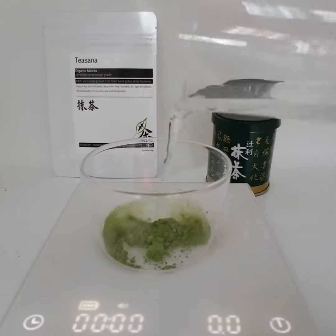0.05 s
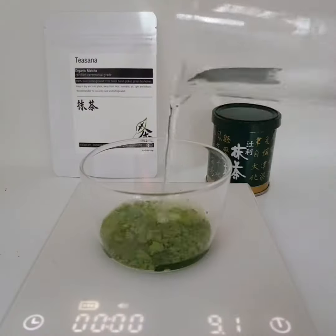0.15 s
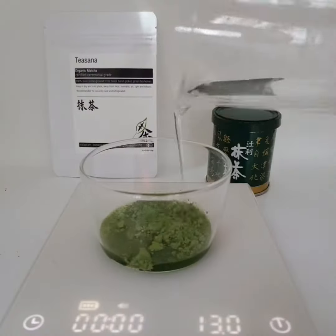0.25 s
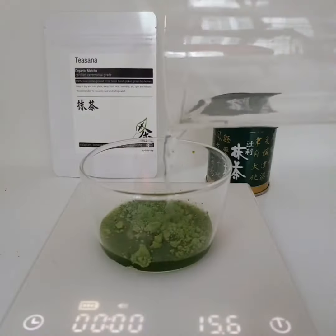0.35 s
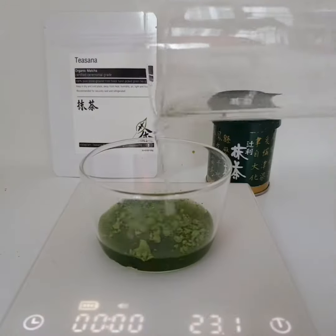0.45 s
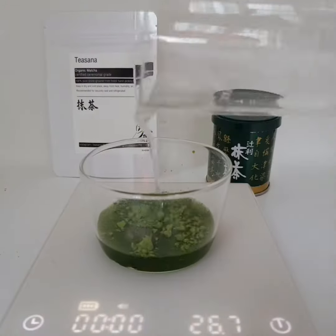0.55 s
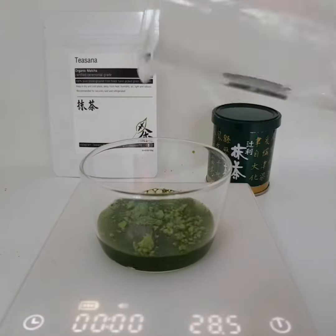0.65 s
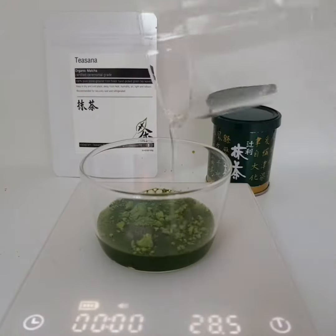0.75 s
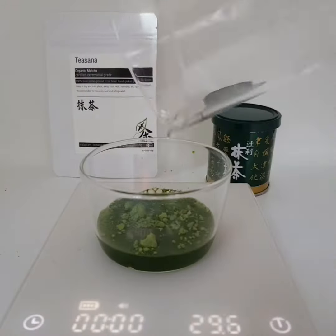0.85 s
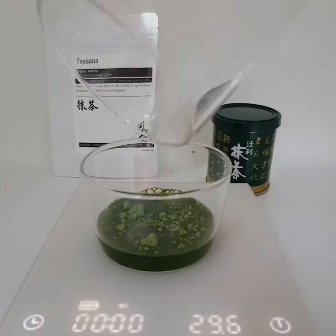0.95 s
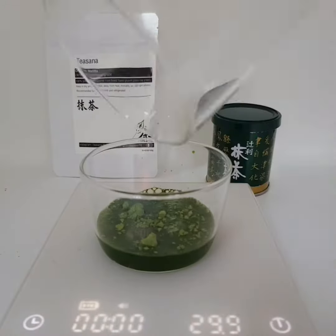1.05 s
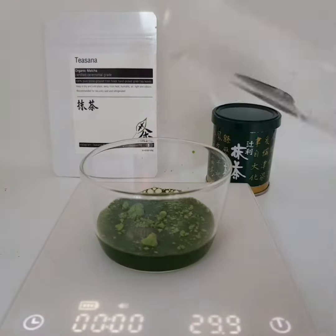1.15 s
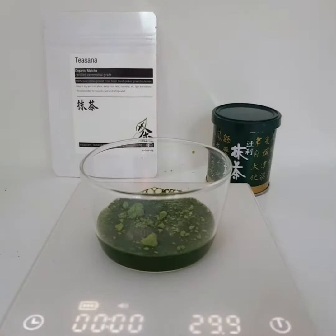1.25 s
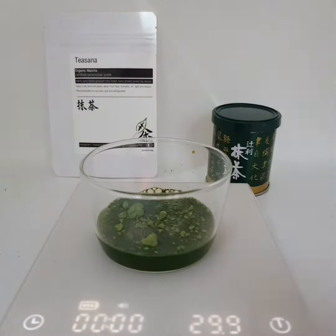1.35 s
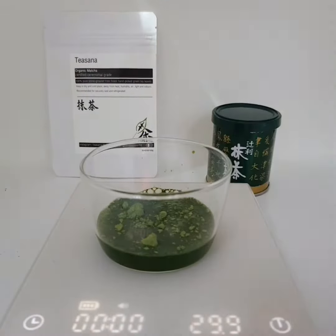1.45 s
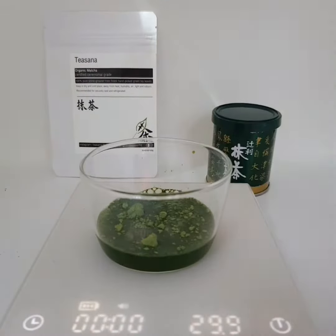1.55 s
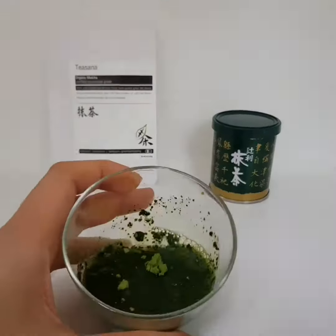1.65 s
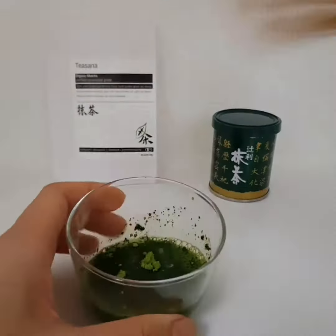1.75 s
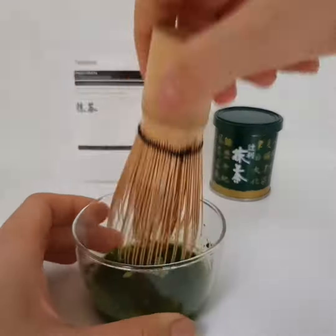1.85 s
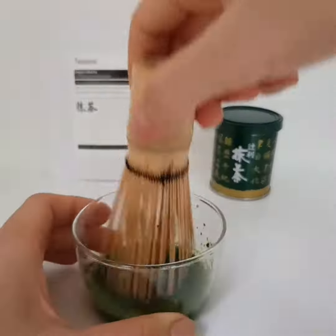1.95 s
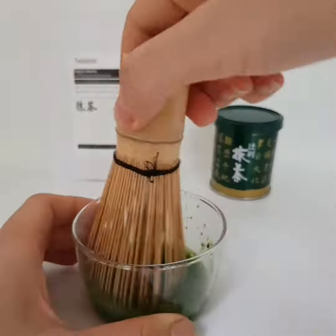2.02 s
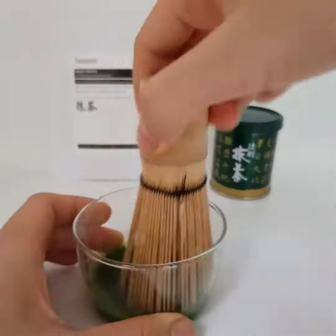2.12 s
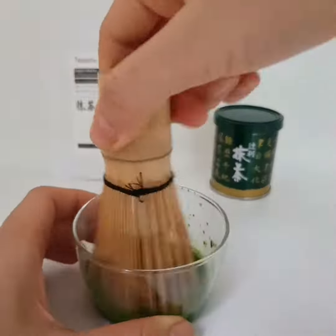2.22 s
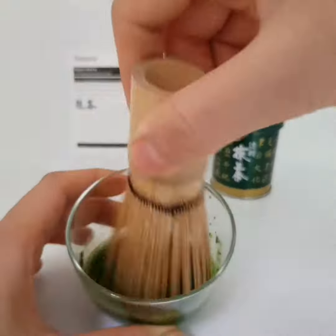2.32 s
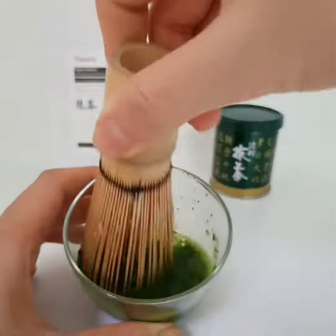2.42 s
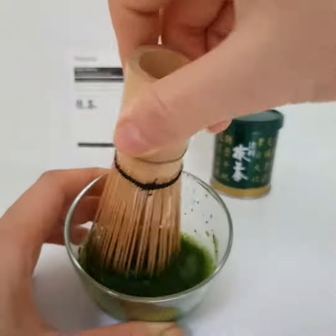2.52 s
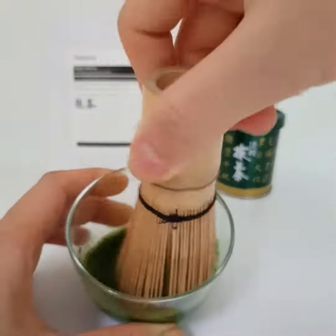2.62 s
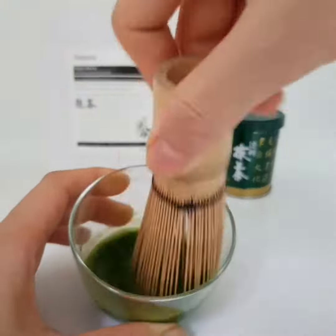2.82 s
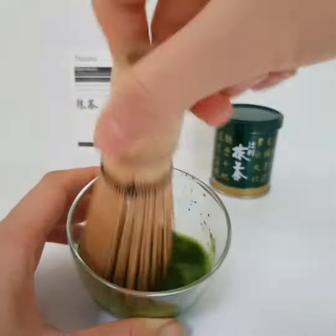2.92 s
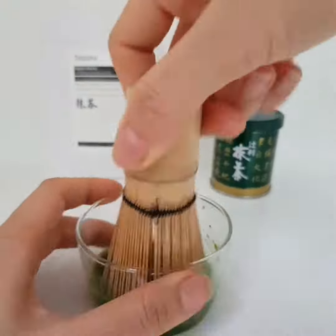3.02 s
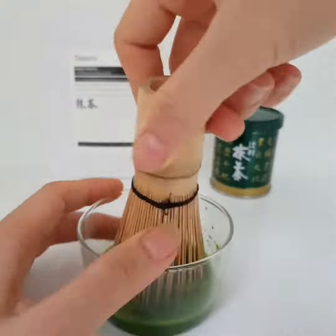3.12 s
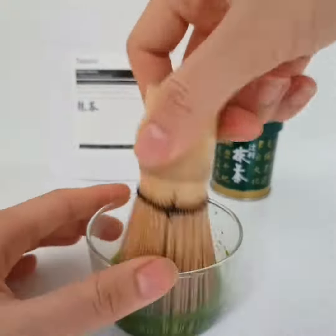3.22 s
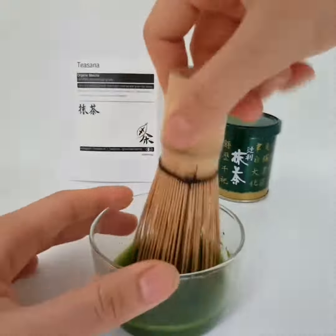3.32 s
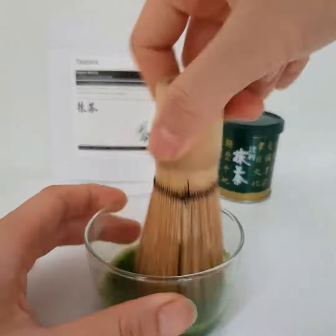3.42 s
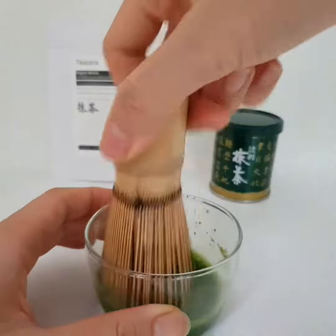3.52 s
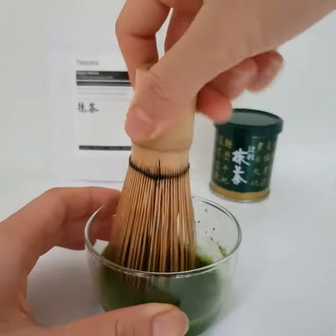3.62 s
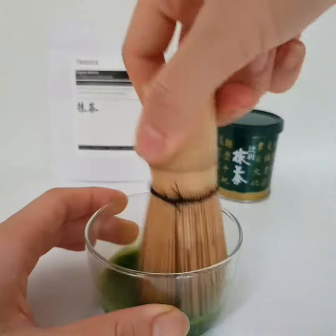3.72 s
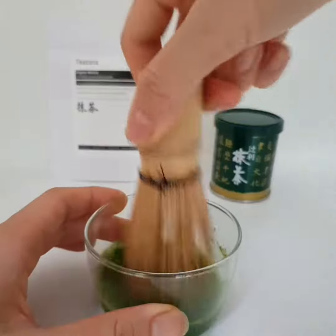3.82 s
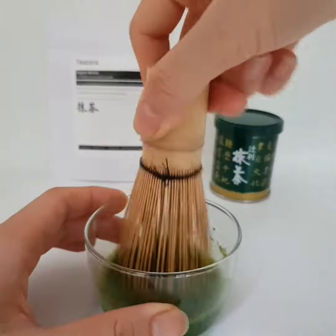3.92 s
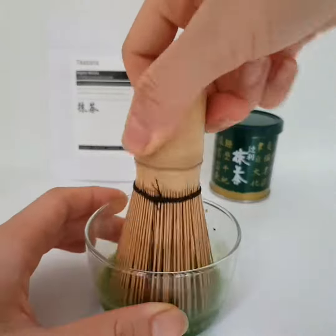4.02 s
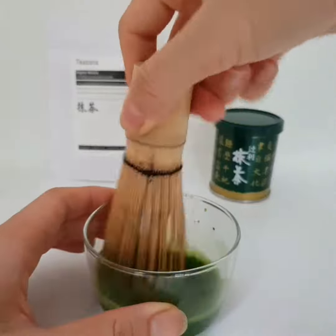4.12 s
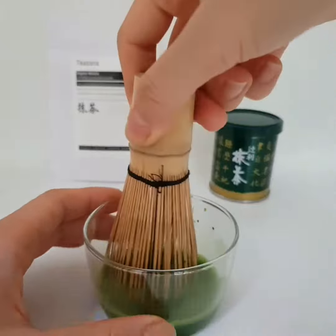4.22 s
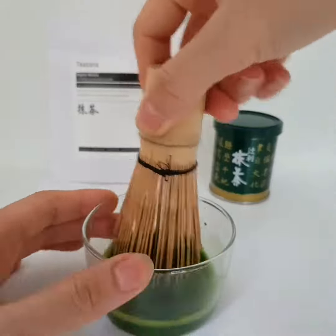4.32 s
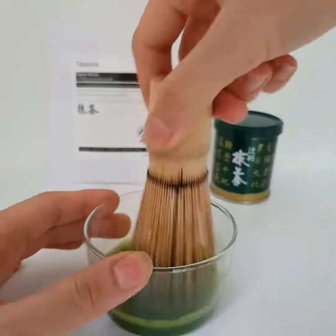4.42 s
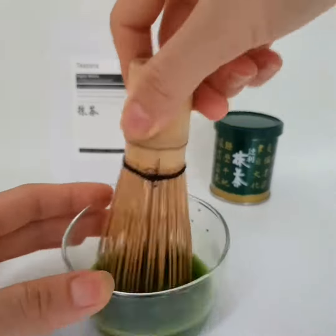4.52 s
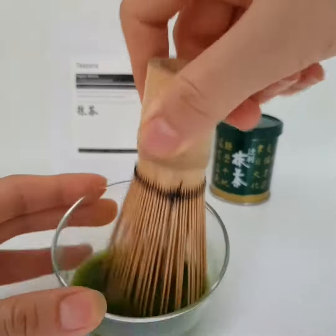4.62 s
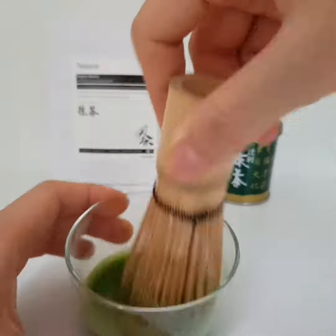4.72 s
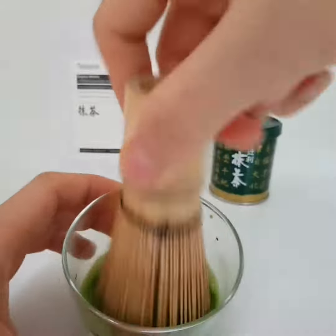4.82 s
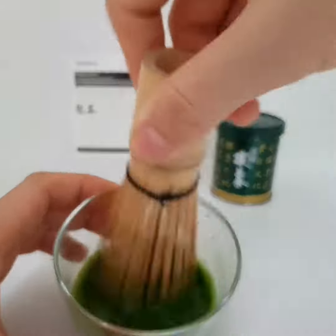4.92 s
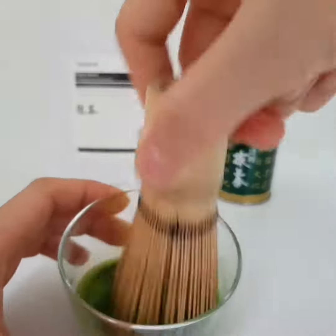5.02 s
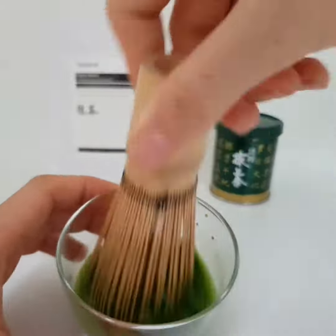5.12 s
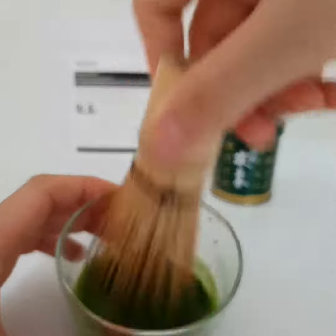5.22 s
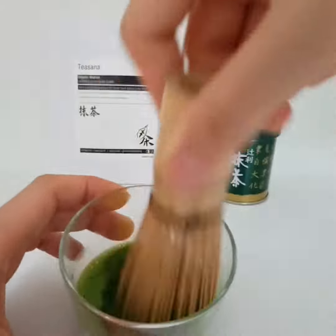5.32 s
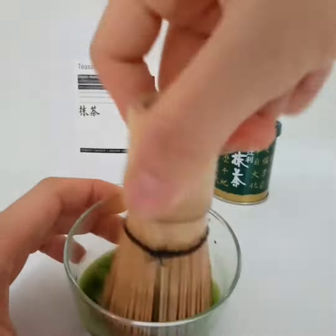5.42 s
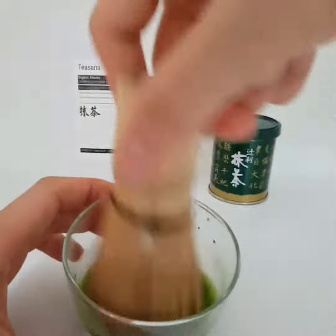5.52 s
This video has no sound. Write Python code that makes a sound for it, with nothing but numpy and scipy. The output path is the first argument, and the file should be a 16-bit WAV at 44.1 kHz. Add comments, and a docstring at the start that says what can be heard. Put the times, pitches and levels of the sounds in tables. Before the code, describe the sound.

Short gushes of water bubble into a glass bowl, a light clink follows, then fast wet bamboo whisking with soft low bumps.

```python
"""Matcha making, close to a camera with two microphone ports; a low hum, faint air and table rumble run throughout.
First gushes of hot water spatter and slap the powder in a glass bowl; droplets ping, trapped bubbles ring as plops.
The last thread of water sings in sine blips, a short noise hiss passes on the right, and the glass clinks.
Then a bamboo whisk scrubs the bowl: dense random slips scrape the glass and the churned tea fizzes in its hollow,
while low decaying sines thump through the table. Late on, a thumb drags along the bowl."""
import sys
import numpy as np
from scipy import signal
from scipy.fft import rfft, irfft, next_fast_len
from scipy.io import wavfile
from scipy.ndimage import uniform_filter1d, map_coordinates

SR = 44100
rng = np.random.default_rng(int(sys.argv[2]) if len(sys.argv) > 2 else 0)


def materialize(psi):
    """Save the field psi as 16-bit PCM at rate SR to the path in sys.argv[1].

    A 1-D psi becomes a single channel; in a 2-D psi each row is a channel.
    """
    bounded = np.clip(np.atleast_2d(psi).T, -1, 1)
    quanta = np.round(bounded * 32767).astype(np.int16)
    wavfile.write(sys.argv[1], SR, quanta)


N = 244755
TIME = np.arange(N) / SR

# In all tables level_db is before the trim in the function; a positive left_right_db is louder on the left.
# Spectra list pitch_hz, level_db; they set colour only, as the sound is then scaled to rms 1.


def amp(db):
    """Decibels to gain."""
    return 10 ** (np.asarray(db) / 20)


def unit(x):
    """Scaled to rms 1."""
    return x / np.sqrt(np.mean(x ** 2) + 1e-20)


def along(points, hz):
    """(Hz, value) points read on a log axis."""
    f, v = np.transpose(points)
    return np.interp(np.log(hz + 1), np.log(f + 1), v)


def curves(rows):
    """One value per sample for each column after the time."""
    s, *cols = np.transpose(rows)
    return [np.interp(TIME, s, c) for c in cols]


def wobble(rate):
    """A smooth random curve, rate knots a second."""
    knots = rng.standard_normal(int(N * rate / SR) + 4)
    return map_coordinates(knots, [TIME * rate])


def filtered(x, response):
    """x times a complex response of frequency."""
    m = next_fast_len(N + SR // 2)
    return irfft(rfft(x, m) * response(np.fft.rfftfreq(m, 1 / SR)), m)[..., :N]


def coloured(x, spectrum):
    """x given a spectrum, at rms 1."""
    return unit(filtered(x, lambda hz: amp(along(spectrum, hz))))


def noise():
    """Two unrelated white noises."""
    return rng.standard_normal((2, N))


def panned(left_right_db):
    """Left and right gains for a level difference."""
    db = np.atleast_1d(left_right_db)
    return amp(np.array([db, -db]) / 2)


def grains(rate, spread_db):
    """Two streams of tiny random impacts, rate a second, of uneven size."""
    hits = rng.random((2, N)) < rate / SR
    return unit(hits * noise() * amp(spread_db * np.clip(noise(), -2, 2)))


def patches(x, patchy_db):
    """The colour of a rustle shifts from instant to instant."""
    z = signal.stft(x, nperseg=512)[2]
    field = uniform_filter1d(rng.standard_normal(z.shape[1:]), size=4, axis=0)
    field = uniform_filter1d(field, size=7, axis=1)
    gain = amp(patchy_db * np.minimum(unit(field), 2))
    return unit(signal.istft(z * gain, nperseg=512)[1][:, :N])


def swell(start, length, rise_s, fall_db_per_s):
    """Attack, hold and release of one movement."""
    attack = np.sin(np.pi / 2 * np.clip((TIME - start) / rise_s, 0, 1)) ** 2
    return attack * amp(-fall_db_per_s * np.clip(TIME - start - length, 0, 1))


def swells(rows, rise_s, fall_db_per_s):
    """The envelope of (start, length, dB) movements, the strongest one leading at each instant."""
    return np.max([amp(db) * swell(s, length, rise_s, fall_db_per_s) for s, length, db in rows], axis=0)


def add(track, s, sound):
    """Mix a sound in at a time."""
    part = track[:, round(s * SR):][:, :sound.shape[-1]]
    part += sound[..., :part.shape[1]]


def walls(x, wet_db, t60, delay):
    """Near surfaces answer each microphone port with its own short tail, building up over delay seconds."""
    t = np.arange(SR // 6) / SR
    tail = rng.standard_normal((2, len(t))) * amp(-60 * t / t60) * np.clip(t / delay, 0, 1) ** 2
    tail *= amp(wet_db) / np.linalg.norm(tail[0])
    tail[:, 0] = 1  # the direct sound
    return signal.fftconvolve(np.atleast_2d(x), tail, axes=1)


# likeness of what the two ports hear, held to 0..1: pitch_hz, likeness
PORT_LIKENESS = [(60, 0.3), (120, 2.1), (250, .5), (500, 0.14), (2000, 0.05), (8000, -0.16), (13000, 0.4)]
# balance between the ports: pitch_hz, left_right_db
PORT_BALANCE = [(50, -6), (110, -9.5), (200, -0.5), (500, -8), (800, -3.5), (1200, -4), (1700, -12),
                (2700, 2), (4300, 8.5), (6400, 6), (8000, 10), (9800, -2), (14000, 2.5)]


def ports(pair):
    """Two unrelated signals become what the left and right microphone ports hear."""
    def mix(hz):
        turn = np.arccos(np.clip(along(PORT_LIKENESS, hz), 0, 1)) / 2
        return np.array([np.cos(turn), np.sin(turn)])

    mid, side = filtered(pair, mix)
    return unit(filtered(np.array([mid + side, mid - side]), lambda hz: panned(along(PORT_BALANCE, hz))))


# level of the hum: time_s, level_db
HUM_LEVEL = [(0.0, -53), (0.1, -45.5), (0.3, -45), (0.55, -51.5), (1.08, -46), (1.22, -54), (1.6, -47.5),
             (2.4, -45), (2.8, -52), (4.0, -48), (5.55, -58.5)]
HUM_HZ, HUM_DRIFT_HZ = 99.7, 1.177  # nearly steady in pitch


def low_hum():
    """One low sine wavers in level and drifts slightly in pitch."""
    level_db, = curves(HUM_LEVEL)
    pitch_hz = HUM_HZ + HUM_DRIFT_HZ * wobble(3)
    waver = amp(1.8 * wobble(24))
    tone = unit(np.sin(2 * np.pi * np.cumsum(pitch_hz) / SR + 0.5 * wobble(20)))
    return amp(level_db - 0.5) * waver * tone * panned(0.57)


# faint air of the place: pitch_hz, level_db
AIR_COLOUR = [(100, 5), (300, -9), (500, -7.5), (900, -11), (2000, -10), (5000, -22), (7000, -20),
              (8200, -33), (11500, -12.5), (15800, -14)]


def room_air():
    """Steady coloured noise, faint and unrelated at the two ports."""
    return amp(-71.5) * coloured(noise(), AIR_COLOUR)


# how hard the table trembles, from pouring to brisk whisking: time_s, level_db
TREMBLE_LEVEL = [(0.0, -54.5), (0.8, -68.5), (1.25, -59), (1.6, -55.5), (2.3, -49.5), (2.72, -57.5),
                 (3.4, -42), (3.95, -51.5), (4.35, -46), (4.9, -49.5), (5.55, -47.5)]
# spectrum of the trembling table: pitch_hz, level_db
RUMBLE_COLOUR = [(15, -25), (30, -13), (48, -4.5), (75, -8.5), (120, -19), (200, -55), (400, -78)]


def trembling():
    """The work shakes the table, heard as deep noise of uneven strength."""
    level_db, = curves(TREMBLE_LEVEL)
    return amp(level_db + 6.5 + 1.24 * wobble(14)) * ports(coloured(noise(), RUMBLE_COLOUR))


# the hands shift their grip: start_s, length_s, level_db
GRIP_SHIFTS = [(0.07, 0.13, -62.5), (1.12, 0.04, -56), (1.53, 0.27, -51.5), (2.03, 0.12, -58),
               (2.17, 0.13, -51), (2.36, 0.023, -52.5), (2.835, 0.018, -50.5), (2.955, 0.012, -48),
               (4.18, 0.018, -61), (4.61, 0.065, -53), (4.8, 0.072, -55), (5.05, 0.022, -54)]
GRIP_RISE_S, GRIP_FALL_DB_PER_S = 0.01, 247
# spectrum of hands on the bowl: pitch_hz, level_db
RUBBING_COLOUR = [(60, -12.5), (130, 4), (180, 1), (260, -6.5), (380, -19.5), (700, -28.5), (1500, -48.5)]
RUB_DB, RUB_FOLLOWS = -53.5, 0.36  # steady rubbing, and its dB per dB of trembling


def rubbing():
    """Hands rub the bowl in dull noise that follows the trembling and swells with each shift of grip."""
    tremble_db, = curves(TREMBLE_LEVEL)
    resting = amp(RUB_DB + RUB_FOLLOWS * (tremble_db - tremble_db.mean()))
    shifting = amp(3.5) * swells(GRIP_SHIFTS, GRIP_RISE_S, GRIP_FALL_DB_PER_S)
    effort = np.hypot(resting, shifting) * amp(2.14 * wobble(15))
    return effort * ports(coloured(noise(), RUBBING_COLOUR))


# gushes of water landing in the bowl: start_s, length_s, level_db
WATER_GUSHES = [(0.065, 0.11, -71.5), (0.132, 0.028, -57.5), (0.205, 0.052, -64.5), (0.26, 0.068, -75),
                (0.378, 0.16, -60.5), (0.407, 0.027, -51.5), (0.703, 0.047, -55.5)]
GUSH_RISE_S, GUSH_FALL_DB_PER_S = 0.03, 423
# spectrum of the spatter: pitch_hz, level_db
SPATTER_COLOUR = [(900, -25), (1600, 1), (2200, -4.5), (2800, -3.5), (3400, -8.5), (4400, -13), (6400, -8),
                  (8600, -12.5), (11300, -2.5), (15800, -14)]


def spatter():
    """Each gush breaks into a dense shower of tiny droplet impacts."""
    flow = swells(WATER_GUSHES, GUSH_RISE_S, GUSH_FALL_DB_PER_S)
    drops = patches(grains(5000, spread_db=3), patchy_db=2)
    return flow * amp(4 + 0.81 * wobble(69.0)) * coloured(drops, SPATTER_COLOUR)


# the first water slaps the powder: start_s, level_db
POWDER_SLAP = [(0.1547, -22.5)]
# spectrum of the slap: pitch_hz, level_db
SLAP_SPECTRUM = [(700, -79), (1400, -13), (1900, 11), (2600, -14), (3400, 7), (4400, -8.5), (8000, -16),
                 (12000, -7.5), (16000, -14)]


def slap():
    """Water striking the powder gives a brief noise burst with two short tones in it."""
    out = np.zeros((2, N))
    for s, db in POWDER_SLAP:
        age = np.maximum(TIME - s, 0)
        ring = sum(np.sin(2 * np.pi * hz * age) for hz in (1900, 3400))
        burst = coloured(noise(), SLAP_SPECTRUM) + amp(-9.0) * ring
        envelope = np.exp(-(age / 0.011) ** 2) * (1 - np.exp(-age / 0.0003))
        out += amp(db - 9) * envelope * burst
    return out


# single droplets and tines ping: start_s, level_db, pitch_hz
DROPLET_PINGS = [(0.187, -44, 11200), (1.283, -53, 5600), (2.2255, -37, 13000), (2.4184, -47, 6400),
                 (3.3904, -35, 4440), (4.7172, -45, 11500), (5.3358, -51, 13400)]


def pings(t60=0.028, grit=0.76):
    """A small contact: one short ring with a gritty edge."""
    out, t = np.zeros((2, N)), np.arange(SR // 20) / SR
    edge = coloured(noise(), [(2500, -38), (5500, 7), (8000, 7), (14000, 5)])
    for s, db, hz in DROPLET_PINGS:
        ring = np.sin(2 * np.pi * hz * t) + grit * edge[:, round(s * SR):][:, :len(t)]
        envelope = amp(db - 3.0 - 60 * t / t60) * (1 - np.exp(-t / 0.0024))
        add(out, s, envelope * panned(5.9) * ring)
    return out


# air bubbles trapped by the stream and by the whisk: start_s, level_db, pitch_hz, left_right_db
BUBBLES = [(0.3882, -38.5, 1800, -9), (0.4111, -34.5, 1746, -6), (0.428, -43, 1480, 6),
           (0.4375, -32, 1500, 4), (0.4565, -25.5, 1800, -6), (0.476, -33, 1463, 6),
           (0.496, -44.5, 1570, 15), (0.5117, -30, 1496, -9.5), (0.5233, -31.5, 1580, 9.5),
           (0.538, -44.5, 1370, -3), (0.728, -39, 1870, -8), (0.7551, -35, 1865, -7),
           (2.6808, -38, 1640, -11), (2.8956, -41, 1990, 1), (3.3257, -42, 1604, -10),
           (3.4416, -40.5, 1935, 10), (3.8584, -36.5, 1730, -3), (4.0832, -27.5, 1620, -5),
           (4.4599, -42.5, 1300, -14), (4.7761, -35, 1820, 2), (5.1652, -47, 1644, 19),
           (5.318, -43, 1414, -6)]


def plops(t60=0.027, rise=0.072, splash_db=-8):
    """Each bubble bursts in with a splash and rings briefly, rising in pitch as it nears the surface."""
    out, t = np.zeros((2, N)), np.arange(SR // 20) / SR
    splashes = coloured(noise(), [(800, -14), (1350, -2), (1900, 18.0), (2500, -3.5), (3500, -1),
                                  (4300, -40.0), (9000, -22)])
    for s, db, hz, pan_db in BUBBLES:
        ring = np.sin(2 * np.pi * hz * (t + rise * t * (t / t60 - .5)))
        splash = amp(splash_db) * splashes[:, round(s * SR):][:, :len(t)]
        bubble = (ring + splash) * amp(-60 * t / t60) * (1 - np.exp(-t / 0.00097))
        near = walls(bubble, wet_db=0.5, t60=0.029, delay=0.0069)
        add(out, s, amp(db + 1.5) * panned(pan_db) * near)
    return out


# the last thread of water: start_s, length_s, level_db, pitch_hz
LAST_THREAD = [(1.158, 0.027, -70.5, 1535), (1.211, 0.024, -62.5, 1540), (1.274, 0.023, -74, 1430),
               (1.336, 0.011, -75, 1500)]
BLIP_RISE_S, BLIP_FALL_DB_PER_S = 0.014, 503


def dribble():
    """The thread of water sings in short sine blips, leaning right, with an unsteady phase."""
    out = np.zeros((2, N))
    waver = 0.7 * wobble(140)  # radians
    for s, length, db, hz in LAST_THREAD:
        envelope = amp(db + 2.5) * swell(s, length, BLIP_RISE_S, BLIP_FALL_DB_PER_S)
        out += envelope * panned(-11) * np.sin(2 * np.pi * hz * TIME + waver)
    return out


# spectrum of the short hiss: pitch_hz, level_db
HISS_SPECTRUM = [(240, -30), (400, -5.5), (804, -0.5), (1590, 0), (2290, -8), (2800, -1), (3500, -3.5),
                 (4330, -16.5), (6130, -6), (7930, -22.5), (11100, -16), (15000, -41)]
HISS_START_S, HISS_LENGTH_S, HISS_DB = 1.52, 0.3457, -52
HISS_RISE_S, HISS_SWELL_DB_PER_S, HISS_FALL_DB_PER_S = 0.045, 11.5, 600


def short_hiss():
    """Noise on the right opens with a click and swells slightly before it stops."""
    click_shape = np.exp(-np.abs(TIME - 1.531) / .0005)
    click = amp(-37) * click_shape * coloured(noise(), [(300, 0), (2000, -7), (15000, -18)])
    hiss_db = HISS_DB + HISS_SWELL_DB_PER_S * np.clip(TIME - HISS_START_S, 0, HISS_LENGTH_S)
    envelope = amp(hiss_db) * swell(HISS_START_S, HISS_LENGTH_S, HISS_RISE_S, HISS_FALL_DB_PER_S)
    hiss = envelope * coloured(noise(), HISS_SPECTRUM)
    return (hiss + click) * amp([[-22], [1.5]])  # left, right


# light contacts with the glass: start_s, level_db
GLASS_CONTACTS = [(1.8065, -18), (2.8618, -19)]
# ringing modes of the bowl, damped by a hand: pitch_hz, level_db, t60_s
GLASS_MODES = [(4580, -21, 0.072), (6400, -11, .03), (7200, -14.5, 0.038), (10410, -6.5, 0.039),
               (11930, -9, 0.037), (15630, -25, .025)]


def clinks(chatter_db=-4, chatter_t60=0.068):
    """A contact chatters for a moment and rings the hand-damped glass."""
    out, t = np.zeros((2, N)), np.arange(SR // 6) / SR
    spectrum = [(1500, -19.5), (6500, -9.0), (8500, -13.5), (10500, 1), (16000, -2.0)]
    for s, db in GLASS_CONTACTS:
        ring = sum(amp(level + rng.normal(0, 1) - 60 * t / t60) * np.sin(2 * np.pi * hz * t)
                   for hz, level, t60 in GLASS_MODES)
        chatter = coloured(noise(), spectrum)[:, :len(t)] * amp(chatter_db - 60 * t / chatter_t60)
        touch = (ring + chatter) * (1 - np.exp(-t / 0.0049))
        add(out, s, amp(db + 1.0) * walls(touch, wet_db=-20, t60=0.24, delay=0.0036))
    return out


# strokes, some pressing on the glass, some deeper in the tea: start_s, length_s, scrape_db, churn_db
WHISK_STROKES = [(2.102, 0.017, -62, -72), (2.152, 0.12, -61, -67), (2.292, 0.053, -50, -61.5),
                 (2.42, 0.17, -62.5, -77), (2.535, 0.048, -51, -64.5), (2.651, 0.047, -53.5, -64.5),
                 (2.741, 0.061, -52.5, -63.5), (2.822, 0.066, -44, -53.5), (2.947, 0.1, -53.5, -63.5),
                 (3.005, 0.047, -47.5, -56.5), (3.111, 0.028, -48, -53), (3.178, 0.16, -51.5, -56.5),
                 (3.306, 0.23, -47, -54.5), (3.55, 0.062, -48.5, -63.5), (3.625, 0.17, -52.5, -61),
                 (3.81, 0.049, -46, -53.5), (3.972, 0.09, -49.5, -61.5), (4.047, 0.034, -41.5, -47.5),
                 (4.233, 0.062, -59.5, -64), (4.329, 0.039, -51, -60.5), (4.395, 0.046, -52, -52),
                 (4.534, 0.058, -54.5, -62.5), (4.693, 0.081, -62, -65), (4.752, 0.14, -46, -53),
                 (4.914, 0.026, -54.5, -57.5), (4.987, 0.056, -53.5, -58), (5.107, 0.061, -46, -51.5),
                 (5.214, 0.12, -56.5, -61), (5.368, 0.14, -55.5, -63)]
STROKE_RISE_S, SCRAPE_FALL_DB_PER_S, CHURN_FALL_DB_PER_S = 0.025, 281, 210
# tines touching the glass between strokes, except for one lift: start_s, length_s, level_db
TINE_CONTACT = [(2.105, 2.5, -61.5), (4.715, 0.59, -56.5)]
# the tines land on the glass together: start_s, level_db
TINE_CATCHES = [(2.122, -44.5), (2.182, -33.5), (2.847, -21.5), (3.1258, -30), (4.0617, -30),
                (4.2473, -37.5), (4.4957, -38.5), (5.235, -34)]
# spectrum of tines on glass: pitch_hz, level_db
TINE_COLOUR = [(1500, -38), (2400, -6), (3000, -1.5), (3500, -3), (4700, -7.5), (6500, -2.5), (7300, -5.5),
               (8000, -11), (8900, -6), (10600, 1.5), (13000, 0), (15800, -5.5)]


def scrape():
    """Many tines stick and slip on the glass, a dense rustle driven by strokes, contact and catches."""
    strokes = np.array(WHISK_STROKES)
    effort = amp(3.5) * swells(strokes[:, [0, 1, 2]], STROKE_RISE_S, SCRAPE_FALL_DB_PER_S)
    effort = np.hypot(effort, swells(TINE_CONTACT, STROKE_RISE_S, SCRAPE_FALL_DB_PER_S))
    for s, db in TINE_CATCHES:
        age = np.maximum(TIME - s, 0)
        landing = amp(db - 10.5 - 60 * age / 0.27) * (1 - np.exp(-age / 0.0017))
        effort = np.maximum(effort, landing)
    slips = patches(grains(9000, spread_db=2) + .7 * noise(), patchy_db=3)
    return effort * ports(coloured(slips, TINE_COLOUR))


# spectrum of the froth: pitch_hz, level_db
FROTH_COLOUR = [(200, -31), (450, -7.5), (750, -18), (1080, -16), (1400, 1.5), (1900, -5), (2250, -7.5),
                (2800, -1), (6000, -49)]
# resonances of the air in the bowl: pitch_hz, width_hz, level_db
BOWL_AIR = [(1480, 37, -3), (1627, 26, 13.5), (1833, 80, 8.5), (1982, 37, 7.5), (2140, 54, 13)]


def churn():
    """The stirred tea fizzes in tiny impacts, some ringing the air resonances of the bowl."""
    stirring = amp(3) * swells(np.array(WHISK_STROKES)[:, [0, 1, 3]], STROKE_RISE_S, CHURN_FALL_DB_PER_S)

    def bowl(f):
        return sum(amp(db) * 1j * f * w / (c * c - f * f + 1j * f * w) for c, w, db in BOWL_AIR)

    hollow = unit(filtered(grains(450, spread_db=-1.5), bowl))
    froth = coloured(grains(2000, spread_db=-1.5), FROTH_COLOUR) + amp(-2) * hollow
    return stirring * ports(patches(froth, patchy_db=3.2))


NOTCH_HZ, NOTCH_SWING_HZ, NOTCH_WIDTH_HZ, NOTCH_DB = 2854, 300, 366, -14.5


def notched(x):
    """A dip in the spectrum wanders as the whisk moves in the bowl."""
    hz, t, z = signal.stft(x, SR, nperseg=512)
    centre = NOTCH_HZ + NOTCH_SWING_HZ * np.interp(t, TIME, wobble(12))
    dip = np.exp(-((hz[:, None] - centre) / NOTCH_WIDTH_HZ) ** 2)
    return signal.istft(z * amp(NOTCH_DB * dip), SR, nperseg=512)[1][:, :N]


def whisk():
    """Scrape and churn share a spectral dip, and flutter together as the tines slip in bunches."""
    flutter = amp(1.6 * wobble(65) + wobble(150))
    return notched(scrape() + churn()) * flutter


# dull bumps through the table: start_s, level_db, pitch_hz
TABLE_BUMPS = [(2.18, -34.5, 76), (2.319, -35, 61.4), (2.852, -33, 93), (2.962, -29, 59),
               (3.039, -35, 60.7), (3.143, -25.5, 57.7), (3.183, -26, 49), (3.674, -26.5, 60),
               (3.753, -28, 61), (3.782, -24.5, 76.5), (4.198, -21, 64.5), (4.374, -28.5, 54.3),
               (4.407, -29, 72), (4.524, -31.5, 58), (5.082, -28.5, 49.2), (5.195, -21, 57.3),
               (5.238, -26.5, 55.6), (5.312, -26.5, 60), (5.426, -32.5, 52.2)]


def bumps(t60=0.066, attack=0.0091):
    """Soft pushes swing the table in low, quickly damped sines, leaning right."""
    out, t = np.zeros((2, N)), np.arange(SR // 4) / SR
    for s, db, hz in TABLE_BUMPS:
        swing = np.sin(2 * np.pi * hz * t) * amp(-60 * t / t60) * (1 - np.exp(-(t / attack) ** 2))
        add(out, s, amp(db - 3.5) * panned(-16) * swing / np.abs(swing).max())
    return out


# a thumb slides along the bowl: start_s, length_s, level_db
THUMB_SLIDES = [(4.16, 0.15, -60.5), (4.27, 0.032, -48.5), (4.35, 0.14, -56.5), (4.445, 0.015, -49.5),
                (4.515, 0.04, -58)]
SLIDE_RISE_S, SLIDE_FALL_DB_PER_S = 0.015, 450


def thumb():
    """Skin drags on the bowl in soft, dull slips."""
    spectrum = [(200, 7), (500, -2.5), (800, -8), (1150, 1), (1400, -11), (2500, -41)]
    slips = coloured(grains(1500, spread_db=-2.0), spectrum)
    return swells(THUMB_SLIDES, SLIDE_RISE_S, SLIDE_FALL_DB_PER_S) * panned(-3) * slips


def scene():
    """Everything on the table, in stereo, in order of first sound."""
    place = low_hum() + room_air() + trembling() + rubbing()
    water = spatter() + slap() + pings() + plops() + dribble()
    return place + water + short_hiss() + clinks() + whisk() + bumps() + thumb()


TOP_HZ = 15900


def record(dry):
    """The camera keeps nothing above its band limit."""
    return filtered(dry, lambda hz: hz < TOP_HZ)


dry = scene()
out = record(dry)
materialize(out)
```